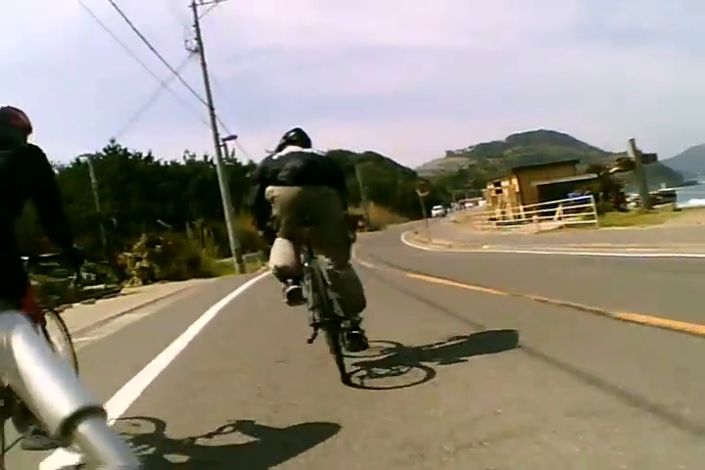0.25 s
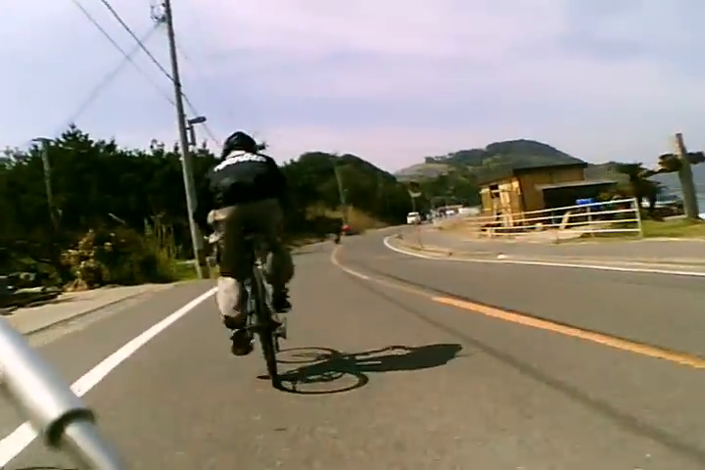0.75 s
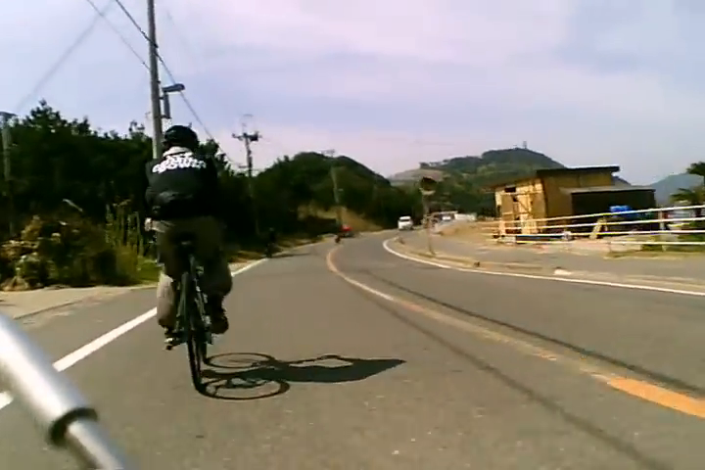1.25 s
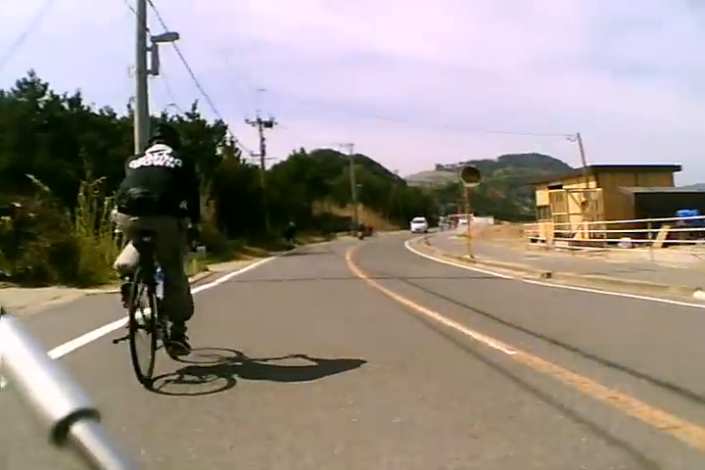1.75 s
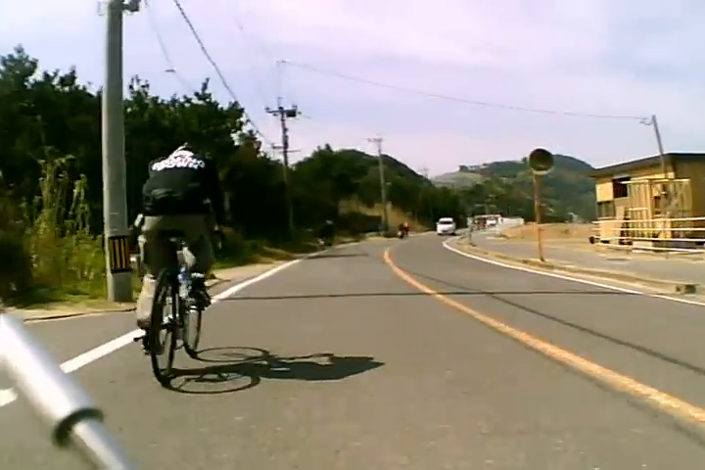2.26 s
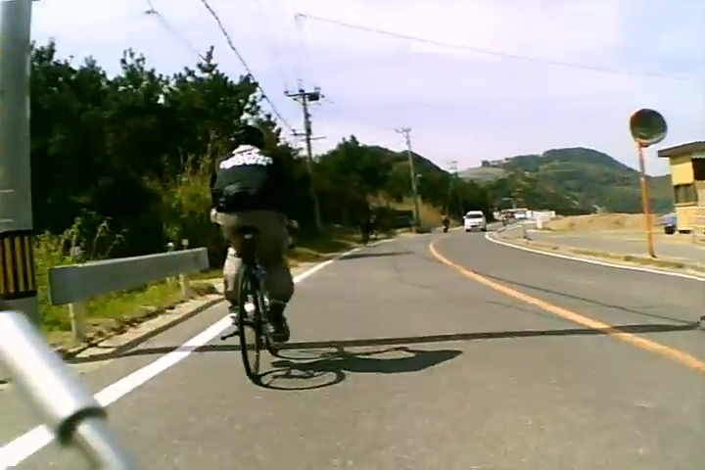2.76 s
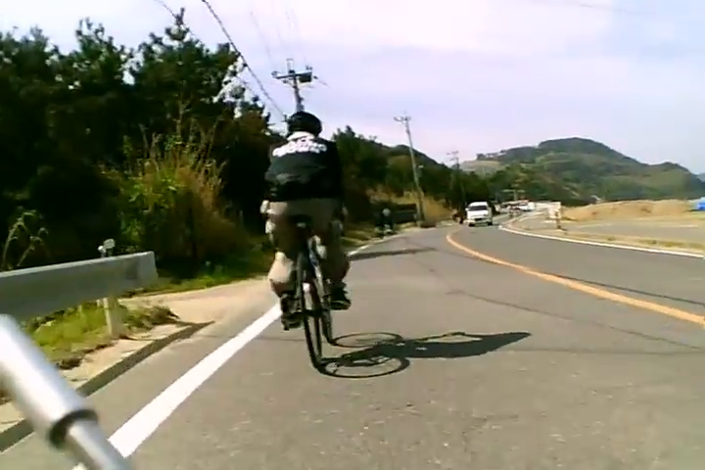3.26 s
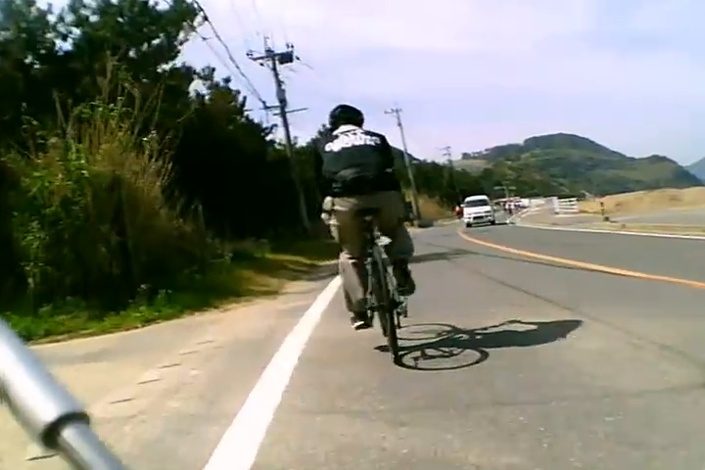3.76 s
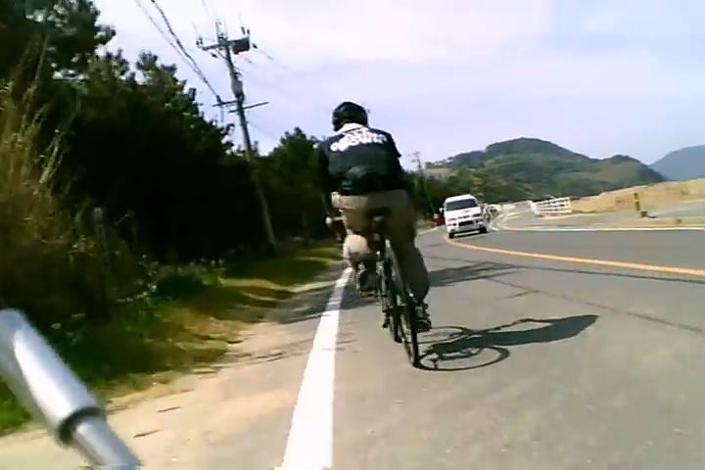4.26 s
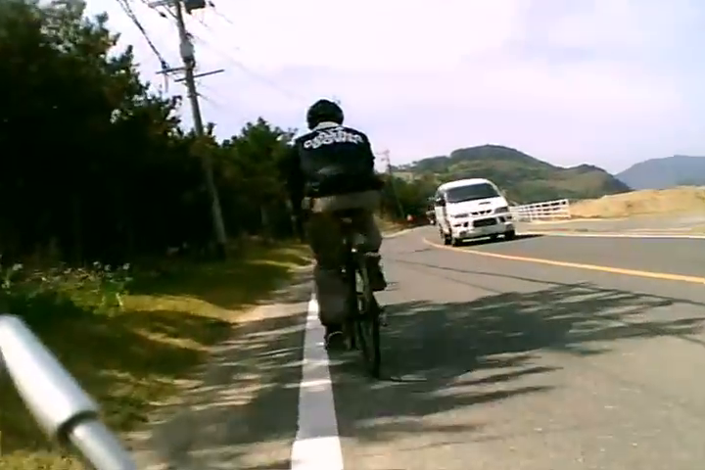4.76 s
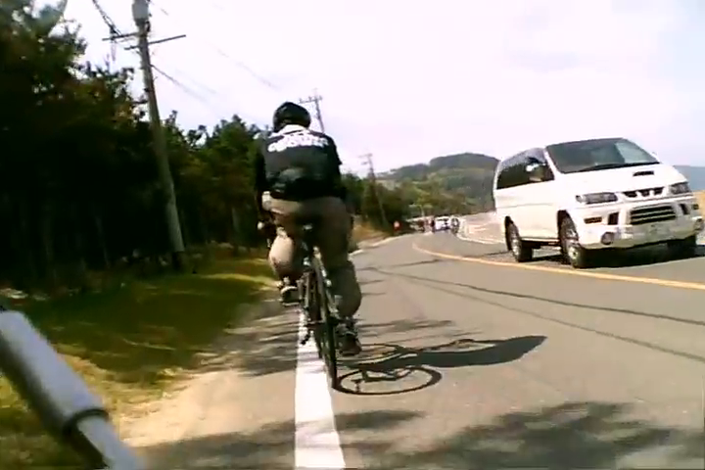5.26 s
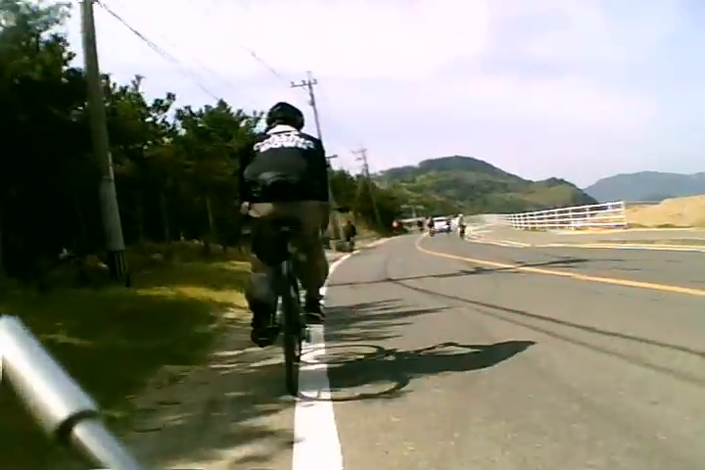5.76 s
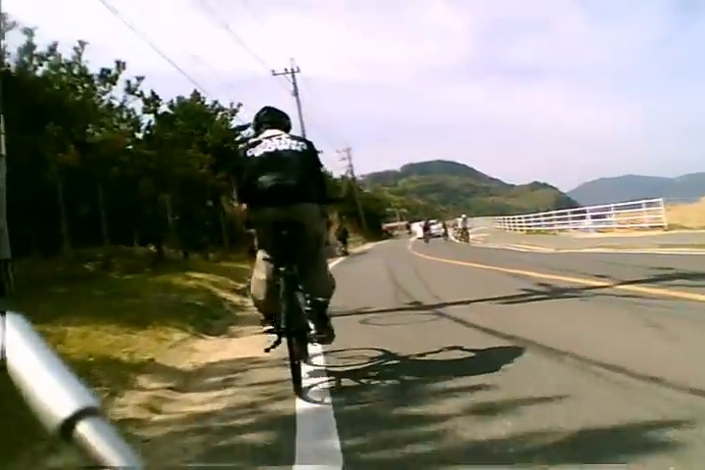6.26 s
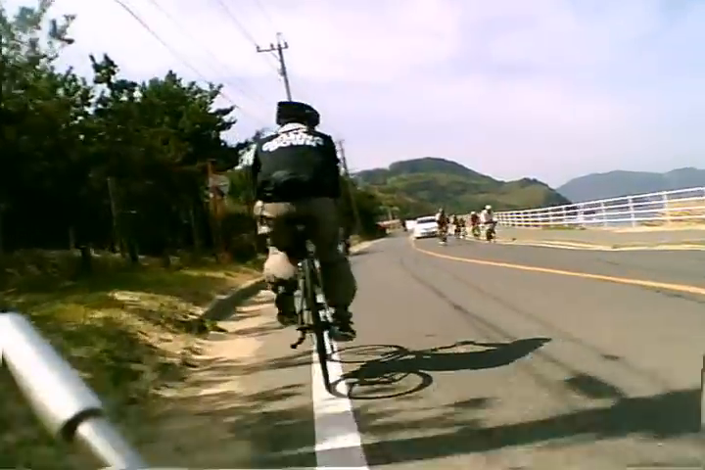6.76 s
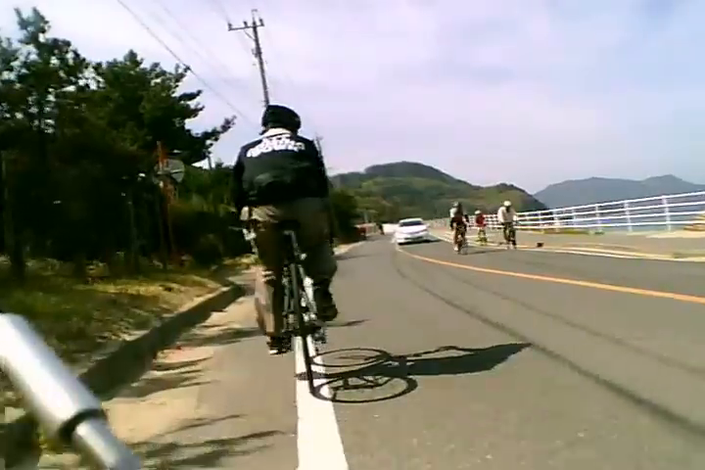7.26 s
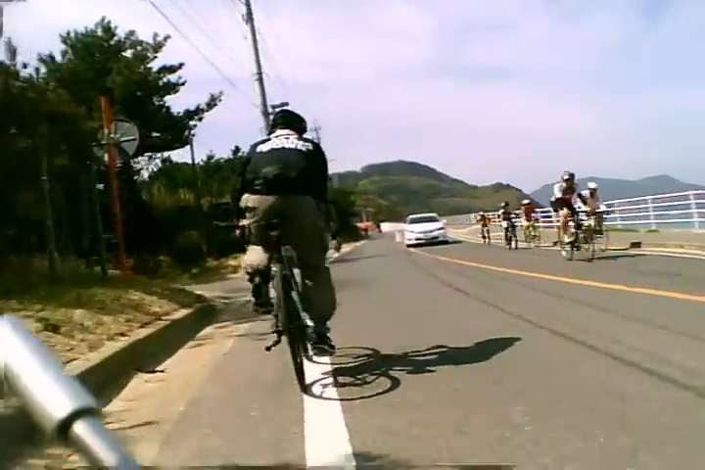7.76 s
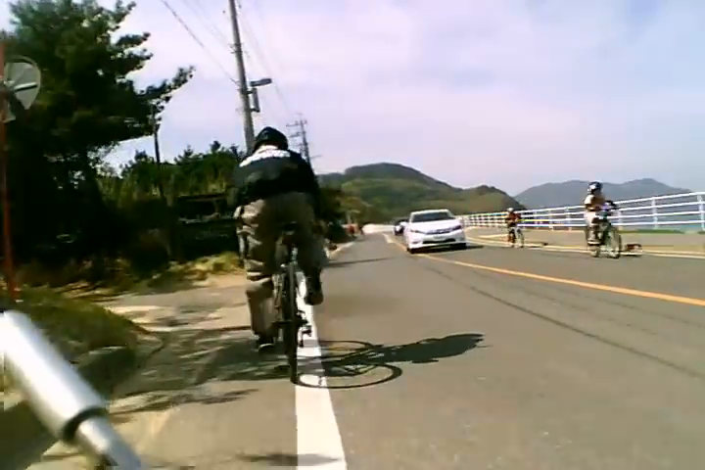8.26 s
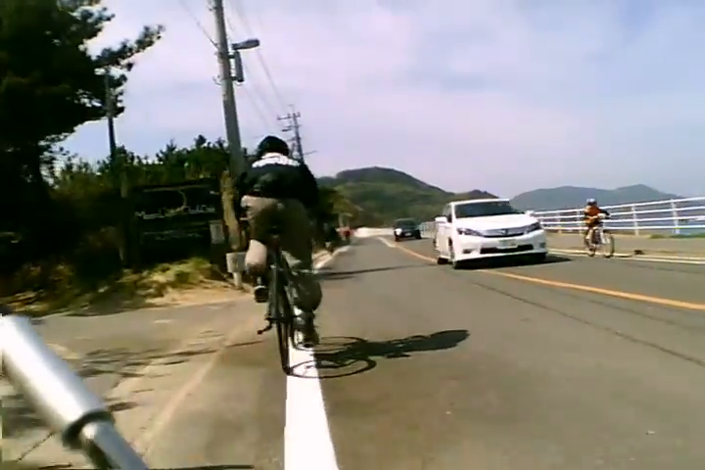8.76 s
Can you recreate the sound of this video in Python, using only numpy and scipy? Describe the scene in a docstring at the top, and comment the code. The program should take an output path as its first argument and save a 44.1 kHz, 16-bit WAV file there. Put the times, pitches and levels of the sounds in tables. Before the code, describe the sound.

Gusty wind and road rumble on a moving bicycle, with bumps, small knocks, light chain noise and one passing van.

```python
"""A bicycle rolls along an asphalt road, heard from a camera clamped to it. The grain of the road shakes
the frame, the tyres roar, the mount hums and the camera case buzzes along. Bumps thud, loose parts knock
and tick, and the chain purrs on its sprockets, now and then brushing its guide. Wind buffets the
microphone underneath, and an oncoming van swishes by on its tyres while the rider eases off."""
import sys
import numpy as np
from scipy import signal
from scipy.fft import rfft, irfft, next_fast_len
from scipy.io import wavfile
from scipy.ndimage import uniform_filter1d

SR = 44100
rng = np.random.default_rng(int(sys.argv[2]) if len(sys.argv) > 2 else 0)


def wav_out(sig):
    """Save sig, one row per channel (or a flat mono array), as 16-bit PCM at SR to the path in sys.argv[1]."""
    wavfile.write(sys.argv[1], SR, np.round(np.clip(np.atleast_2d(sig).T, -1, 1) * 32767).astype(np.int16))


N = 396897
T = np.arange(N) / SR
CHAIN_HZ = 66.54  # links a second, on average

# Levels are fader settings, ahead of each layer's trim; EQ and mode levels only shape the tone.
# wind rumble on the microphone: f/Hz, level/dB
WIND_EQ = [(6, -5), (14, 3), (22, 1.5), (32, -4), (45, -8), (70, -13), (90, -12.5), (125, -21.5),
           (200, -29), (400, -43.5), (2000, -110)]
# headwind bed between gusts: t/s, level/dB
HEADWIND_FADER = [(0, -26), (1.3, -26.5), (1.9, -27), (2.6, -29.5), (3.4, -27.5), (5.3, -27.5),
                  (6.3, -33.5), (6.9, -33), (7.3, -30.5), (7.9, -32), (9, -26)]
# gusts: centre t/s, length/s, boost/dB
WIND_GUSTS = [(.39, 0.095, 2), (0.816, .12, 7), (1.017, 0.17, 6), (1.397, 0.34, 5.5), (3.113, 0.88, 6.5),
              (3.648, 0.042, 7.5), (3.846, 0.22, 4), (4.116, 0.092, 6), (4.382, 0.046, 15),
              (4.58, 0.064, 3.5), (5.13, 0.72, 2.5), (7.283, 0.28, 5), (7.754, 0.058, 10), (8.408, .12, 4)]
# the van's tyres, far off and close by: f/Hz, level/dB
VAN_FAR_EQ = [(300, 12), (620, 10), (900, -9), (1150, -18), (1500, -16), (2000, -4), (2400, -17),
              (3000, -33), (3600, -54), (9000, -51)]
VAN_NEAR_EQ = [(200, -9), (550, -8), (1000, -7), (1500, -21), (2000, -30), (3500, -36), (4800, -28),
               (9000, -44)]
# ring of the sprockets, the chain guide and the camera case: f/Hz, width/Hz, level/dB
SPROCKET_MODES = [(2953, 290, 1), (3790, 69, -3.5), (4343, 224, 3), (4924, 165, 0), (6430, 640, -6.5),
                  (7340, 140, -0.5), (8150, 1250, -11), (10150, 480, -16)]
GUIDE_MODES = [(2866, 150, 12.5), (4930, 140, -1), (6900, 270, 0), (7470, 230, 5), (10300, 380, -1.5),
               (11900, 230, -10.5)]
CASE_MODES = [(1775, 180, 2), (2030, 107, 5.5), (2660, 320, 0), (3020, 120, 6.5), (3800, 126, -2),
              (4000, 210, -4), (4860, 630, -2), (6420, 160, 1), (7080, 460, -6), (7950, 680, -6),
              (10100, 340, -6.5), (13100, 680, -34)]
# chain purr, set by the pull on the pedals: t/s, level/dB
CHAIN_FADER = [(0, -56.5), (1.15, -60), (1.6, -55), (2.8, -58), (3.1, -59.5), (4.3, -61), (4.65, -71),
               (5.8, -68), (6.6, -63), (7.25, -71.5), (8.1, -61.5), (8.55, -63.5), (9, -54)]
# the chain brushing its guide: start t/s, end t/s, level/dB
CHAIN_RUBS = [(0.306, 0.409, -46.5), (0.859, 0.949, -38.5), (1.763, 1.852, -39.5), (1.96, 2.03, -35),
              (2.147, 2.221, -44.5), (2.774, 2.827, -39), (4.104, 4.204, -45.5), (4.229, 4.367, -47),
              (4.844, 4.898, -47.5), (5.136, 5.198, -41.5), (5.602, 5.658, -44), (5.971, 6.034, -49.5),
              (6.252, 6.325, -46), (7.79, 7.88, -49), (8.12, 8.33, -47), (8.55, 8.75, -50.5)]
# the mount clattering over rough patches: start t/s, end t/s, level/dB, tilt/(dB per octave)
MOUNT_CLATTER = [(0.5, 0.548, -48, -4), (1.005, 1.164, -52.5, -10), (1.432, 1.52, -48.5, -3.5),
                 (1.523, 1.612, -45.5, -3), (1.746, 1.83, -52.5, -8), (2.92, 3, -50, -12),
                 (3.21, 3.263, -52, -5), (8.472, 8.519, -58, -2), (8.87, 9.0, -59, -8)]
# bright snap of metal on metal: f/Hz, width/Hz, level/dB
SNAP_MODES = [(8100, 1400, -2.5), (9980, 800, 4), (12300, 1100, -9)]
# the loudest knocks of loose parts: t/s, level/dB, snap level/dB
PART_KNOCKS = [(0.514, -38, -19), (1.47, -33.5, -21), (1.5054, -36.5, -25), (1.546, -36, -22),
               (1.5772, -34.5, -28), (1.621, -33, -15), (1.8077, -38, -17), (1.825, -36.5, -18),
               (1.986, -37.5, -20), (2.5496, -29, -8), (2.695, -35.5, -20), (2.885, -46, -10),
               (2.927, -42, -8), (3.6345, -39.5, -20), (3.6975, -45, -7), (4.2572, -41.5, -8),
               (5.1232, -39.5, -14), (5.336, -43, -11), (5.4938, -38.5, -18), (5.5218, -39, -21),
               (5.65, -43, -22), (5.8604, -46, -18), (6.063, -43.5, -22), (6.142, -41, -17),
               (6.1661, -36, -17), (6.5456, -40, -11), (6.6486, -41.5, -29), (6.759, -41, -18),
               (6.9107, -45, -11), (7.1347, -43.5, -19), (7.3944, -41.5, -23), (7.838, -45, -15),
               (8.0965, -41, -14), (8.1334, -40, -11), (8.491, -41, -27), (8.85, -35.5, -8),
               (8.9173, -39, -16)]
# bumps in the asphalt: t/s, level/dB
ROAD_BUMPS = [(0.245, -22), (0.579, -16.5), (0.807, -12.5), (0.947, -12.5), (1.015, -12), (1.459, -13),
              (1.626, -29), (2.324, -19.5), (2.962, -11.5), (3.549, -16), (3.635, -22), (4.371, -18.5),
              (4.488, -17), (4.609, -24.5), (4.704, -22), (4.945, -23), (5.03, -29), (7.149, -16.5),
              (8.417, -21), (8.841, -20)]
# rough stretches that shake the frame harder: start t/s, end t/s, boost/dB
ROUGH_STRETCHES = [(0.581, 1.147, 7.5), (1.42, 1.668, 6.5), (2.618, 2.692, 6.5), (2.913, 3.252, 7.5),
                   (3.537, 3.77, 1.5), (3.93, 4.033, 8.5), (4.315, 4.51, 4.5), (4.903, 5.077, 2),
                   (7.116, 7.28, 5), (8.62, 8.774, 2.5), (8.773, 8.926, 8)]
# frame and mount, rung by the tyres: f/Hz, width/Hz, level/dB
FRAME_MODES = [(273.4, 19, 5.5), (573, 22, 12), (708, 24, -4.5), (912.5, 16.4, 4), (1008, 59, -5.5)]
# tone of the frame shake, the tyre roar and the case buzz: f/Hz, level/dB
SHAKE_EQ = [(60, -14), (120, 3), (180, 0), (270, 0), (350, -4.5), (480, -9), (660, -10), (800, -18.5),
            (1000, -24), (1200, -36.5), (1500, -45.5), (2600, -43.5), (3600, -74), (8000, -88)]
ROAR_EQ = [(100, -5), (300, -17), (450, -6), (680, 0), (800, -5.5), (1020, -5.5), (1160, -15), (1300, -17),
           (1480, -28.5), (3000, -52), (8000, -84)]
BUZZ_EQ = [(900, -11), (1450, -21), (1700, -6), (1820, -5.5), (1980, 3.5), (2220, -13.5), (2700, -15.5),
           (3020, -6.5), (3300, -24), (4700, -16.5), (5800, -27), (7400, -31), (10000, -30.5), (12500, -50)]
# how hard the bicycle rolls, from its speed and the grain of the asphalt: t/s, level/dB
ROLLING_FADER = [(0, -1), (1.25, 0), (1.6, -1.5), (2.7, -1), (3.45, -2), (4.3, -2), (4.7, -6), (5.5, -4.5),
                 (6.1, -10), (6.5, -9), (6.9, -7), (7.3, -5), (8.55, -4), (9, -2)]
# tyre roar and mount hum: t/s, level/dB
ROAR_FADER = [(0, -47), (2.3, -45.5), (3.4, -50), (5.2, -51), (6.15, -55.5), (6.6, -51), (7.5, -52),
              (8.0, -48.5), (8.6, -53.5), (9, -49)]
HUM_FADER = [(0, -44.5), (4.5, -47), (6.2, -47), (7.4, -43), (8.2, -43), (9, -49)]
# the camera's electronic whine and its microphone's hiss: f/Hz, level/dB
WHINE_TONES = [(5600, -79), (7400, -81)]
HISS_EQ = [(1000, 0), (9000, 0), (11000, -1), (12500, -10)]


def undb(db):
    """Decibels to gain."""
    return 10 ** (np.asarray(db) / 20)


def unit(x):
    """Scale to rms 1."""
    return x / np.sqrt(np.mean(x ** 2))


def add(out, s, sound):
    """Mix a sound in at time s."""
    i = int(np.clip(s * SR, 0, N - 1))
    out[i:i + len(sound)] += sound[:N - i]


def fader(table):
    """Ride a level through (t/s, level/dB) points."""
    return np.interp(T, *np.transpose(table))


def wander(rate):
    """Random drift of rms 1, turning rate times a second."""
    hold = max(int(SR / rate), 1)
    steps = np.repeat(rng.standard_normal(N // hold + 2), hold)
    return unit(uniform_filter1d(steps, hold)[:N])


def eq(x, points):
    """Shape a sound with a curve of (f/Hz, level/dB) points."""
    hz, db = np.transpose(points)
    size = next_fast_len(len(x) + 8192, True)
    freqs = np.maximum(np.fft.rfftfreq(size, 1 / SR), 1)
    gain = undb(np.interp(np.log(freqs), np.log(hz), db))
    return irfft(rfft(x, size) * gain, size)[:len(x)]


def ring(force, modes, scatter_db=0, size=4096):
    """A force rings a part's modes; scatter varies their balance, as where a blow lands does."""
    hz, width, db = np.transpose(modes)[:, :, None]
    t = np.arange(size) / SR
    gain = width * undb(db + scatter_db * rng.standard_normal(db.shape))
    polarity = np.pi * np.arange(len(hz))[:, None]
    partials = gain * np.exp(-np.pi * width * t) * np.sin(2 * np.pi * hz * t + polarity)
    return signal.fftconvolve(force, partials.sum(axis=0))[:len(force)]


def grit(rate, spread_db):
    """Random impacts of uneven size, rate a second."""
    out, hit = np.zeros(N), rng.random(N) < rate / SR
    size, accent = rng.standard_normal(N)[hit], rng.standard_exponential(N)[hit]
    out[hit] = size * undb(spread_db * np.minimum(accent, 4))
    return out


def strike(modes, contact_s, scatter_db, rise_s=0.00035, size=1024):
    """One short scraping contact on a ringing part, peak 1."""
    t = np.arange(size) / SR
    force = rng.standard_normal(size) * np.exp(-t / contact_s) * (1 - np.exp(-t / rise_s))
    hit = ring(force, modes, scatter_db, size)
    return hit / np.abs(hit).max()


def wind(trim_db=3.5):
    """Eddies puff on the microphone port: a low bed that swells with each gust."""
    gust_db = sum(db * np.exp(-(2 * (T - s) / length) ** 2) for s, length, db in WIND_GUSTS)
    eddies = eq(grit(rate=250, spread_db=1.74), WIND_EQ)
    running_rms = np.sqrt(uniform_filter1d(eddies ** 2, size=5500))
    return eddies / running_rms * undb(fader(HEADWIND_FADER) + gust_db + trim_db)


def swish(tone, at_s, passing_s, db):
    """Tyre noise that swells and fades around one moment."""
    return unit(eq(rng.standard_normal(N), tone)) * undb(db) / (1 + ((T - at_s) / passing_s) ** 2)


def van(at_s=5.57, passing_s=0.19, tread_hz=780, climb=0.14):
    """A van's tyres beam treble ahead of it, then roar as it draws level; their hollow band climbs."""
    offset = (T - at_s) / passing_s
    centre_hz = tread_hz * (1 + climb * np.tanh(offset / 2))
    low_noise = unit(eq(rng.standard_normal(N), [(60, 0), (120, -6), (220, -22), (500, -70)]))
    band = low_noise * np.sin(2 * np.pi * np.cumsum(centre_hz) / SR)
    tread = band * undb(-41) * np.exp(-offset ** 2 / 2)
    far = swish(VAN_FAR_EQ, at_s=5.28, passing_s=0.31, db=-41)
    near = swish(VAN_NEAR_EQ, at_s=5.59, passing_s=0.21, db=-48.5)
    return tread + far + near


def chain_purr(seat_s=0.0043, uneven_db=5.5, trim_db=0.5):
    """Links drop on to the teeth one after another, each with its own force."""
    links = np.cumsum(CHAIN_HZ * (1 + 0.029 * wander(4.4))) / SR
    force = undb(uneven_db * rng.standard_normal(2000))[links.astype(int)]
    seating = np.exp(-(links % 1) / CHAIN_HZ / seat_s)
    mesh = (force * seating + 0.14) * rng.standard_normal(N)
    return unit(ring(mesh, SPROCKET_MODES)) * undb(fader(CHAIN_FADER) + trim_db)


def chain_rubs(jitter_s=0.0014, uneven_db=2.5):
    """Link after link grazes the guide, swelling and fading as the chain sways."""
    out = np.zeros(N)
    for start, end, db in CHAIN_RUBS:
        times = np.arange(start, end, 1 / CHAIN_HZ)
        swell = np.hanning(len(times) + 2)[1:-1] ** 0.18
        for s, sway in zip(times, swell):
            late, force = rng.standard_normal(2)
            tick = strike(GUIDE_MODES, contact_s=0.0015, scatter_db=8.5)
            add(out, s + jitter_s * late, sway * undb(db + uneven_db * force) * tick)
    return out


def jiggle(modes, db, spread_db, count):
    """Faint random taps of a loose part."""
    out = np.zeros(N)
    for when, chance in rng.random((count, 2)):
        tap = strike(modes, contact_s=0.0022, scatter_db=2)
        add(out, when * T[-1], tap * undb(db - spread_db * np.log(chance + 0.051)))
    return out


def clatter():
    """The mount bounces in its clamp so fast that the taps merge; each burst has its own brightness."""
    out, taps = np.zeros(N), grit(rate=1500, spread_db=2)
    lowest_hz = CASE_MODES[0][0]
    for start, end, db, tilt in MOUNT_CLATTER:
        force = taps[int(start * SR):int(end * SR)]
        modes = [(hz, width, level + tilt * np.log2(hz / lowest_hz)) for hz, width, level in CASE_MODES]
        add(out, start, unit(ring(force, modes)) * signal.windows.tukey(len(force)) * undb(db))
    return out


def knocks(rebound_s=0.0067, rebound_db=-15, snap_trim_db=8.5, trim_db=3):
    """Loose parts knock and fall back once: the case rings under a bright metal snap."""
    out, high_cut = np.zeros(N), signal.butter(4, 8000, fs=SR, output="sos")
    for s, db, snap_db in PART_KNOCKS:
        body = signal.sosfilt(high_cut, strike(CASE_MODES, contact_s=0.0033, scatter_db=3))
        snap = strike(SNAP_MODES, contact_s=0.0024, scatter_db=3.5)
        knock = unit(body) + unit(snap) * undb(snap_db + snap_trim_db)
        knock *= undb(db + trim_db) / np.abs(knock).max()
        add(out, s, knock)
        add(out, s + rebound_s * rng.uniform(0.6, 1.3), knock * undb(rebound_db))
    return out


def bumps(rise_s=0.0013, decay_s=0.029, trim_db=-1, size=6000):
    """Each bump jolts the frame with a dull, quickly dying shudder."""
    out, t = np.zeros(N), np.arange(size) / SR
    envelope = np.exp(-t / decay_s) * (1 - np.exp(-t / rise_s))
    for s, db in ROAD_BUMPS:
        thud = eq(rng.standard_normal(size), SHAKE_EQ) * envelope
        add(out, s, thud / np.abs(thud).max() * undb(db + trim_db))
    return out


def roughness(attack_s=0.0022, release_s=0.023):
    """Extra shake in dB: it sets in as the wheel meets a rough stretch, holds, and dies away after it."""
    return sum(db * np.clip((T - start) / attack_s, 0, 1) * np.exp(-np.maximum(T - end, 0) / release_s)
               for start, end, db in ROUGH_STRETCHES)


def rolling_bicycle():
    """Asphalt grain shakes the frame; the tyres roar and keep the mount humming; the case buzzes along."""
    rolling_db, rough_db = fader(ROLLING_FADER), roughness()
    patches = wander(60)  # coarse patches of asphalt drive shake and roar together
    shake_db = -34 + 1.02 * rolling_db + rough_db + 1.94 * patches
    shake = unit(eq(grit(rate=3500, spread_db=1.77), SHAKE_EQ)) * undb(shake_db)
    roar_db = 3.5 + fader(ROAR_FADER) + 0.17 * rough_db + 0.93 * patches
    roar = unit(eq(grit(rate=5000, spread_db=2.1), ROAR_EQ)) * undb(roar_db)
    hum = unit(ring(rng.standard_normal(N), FRAME_MODES)) * undb(fader(HUM_FADER))
    buzz_db = -56 + 1.09 * rolling_db + 0.13 * rough_db
    buzz = unit(eq(grit(rate=7000, spread_db=2.7), BUZZ_EQ)) * undb(buzz_db + 1.8 * wander(34))
    return shake + roar + hum + buzz


def scene():
    """The mono mix of all that reaches the camera, through the air and through its clamp."""
    rumble = rolling_bicycle() + wind() + bumps()
    chain = chain_purr() + chain_rubs()
    case_taps = jiggle(CASE_MODES, db=-51.5, spread_db=3.5, count=160)
    guide_taps = jiggle(GUIDE_MODES, db=-53.5, spread_db=-1, count=100)
    return (rumble + chain + case_taps + guide_taps + knocks() + clatter() + van())[None]


def record(dry, hiss_db=-73, top_hz=12400):
    """The camera adds its faint whine and hiss and cuts the top."""
    whine = sum(undb(db) * np.sin(2 * np.pi * hz * T) for hz, db in WHINE_TONES)
    hiss = undb(hiss_db) * eq(rng.standard_normal(N), HISS_EQ)
    high_cut = signal.ellip(8, 0.2, 80, top_hz, fs=SR, output="sos")
    return signal.sosfilt(high_cut, dry + whine + hiss)


dry = scene()
out = record(dry)
wav_out(out)
```